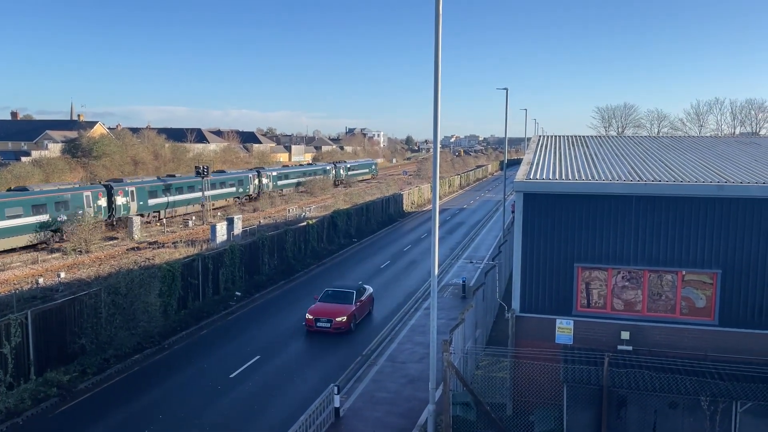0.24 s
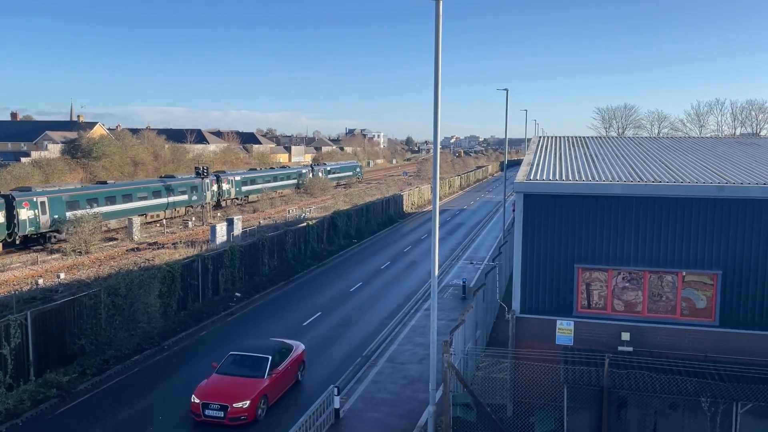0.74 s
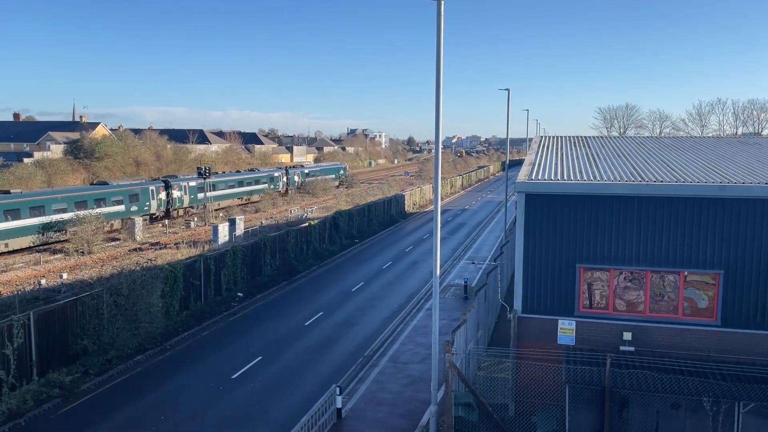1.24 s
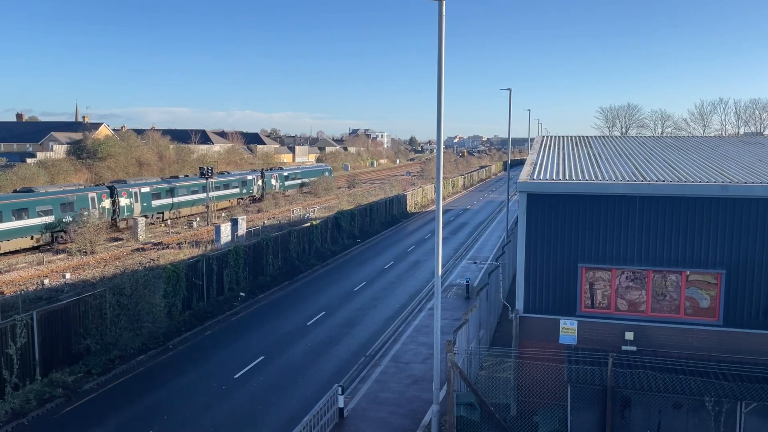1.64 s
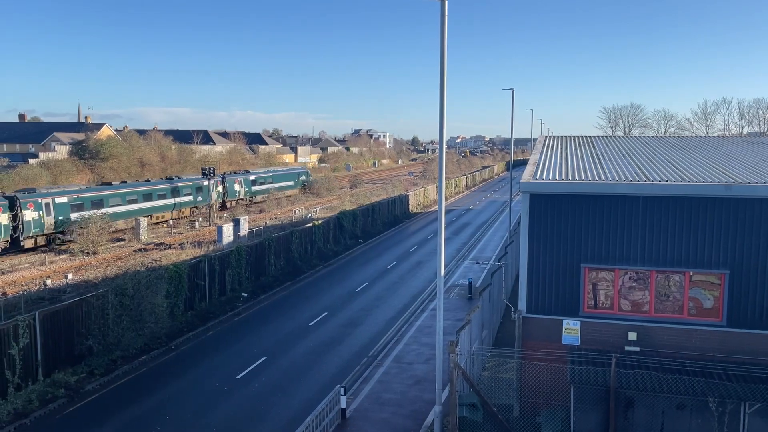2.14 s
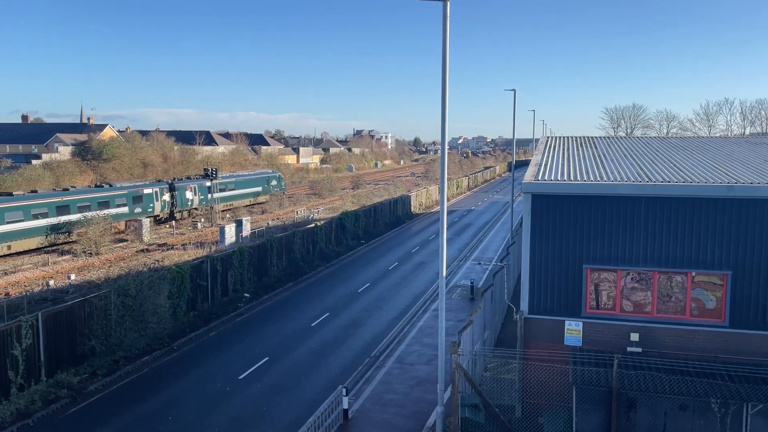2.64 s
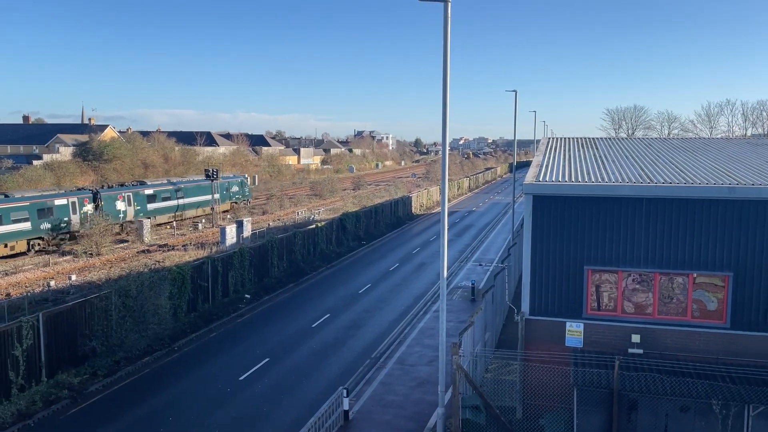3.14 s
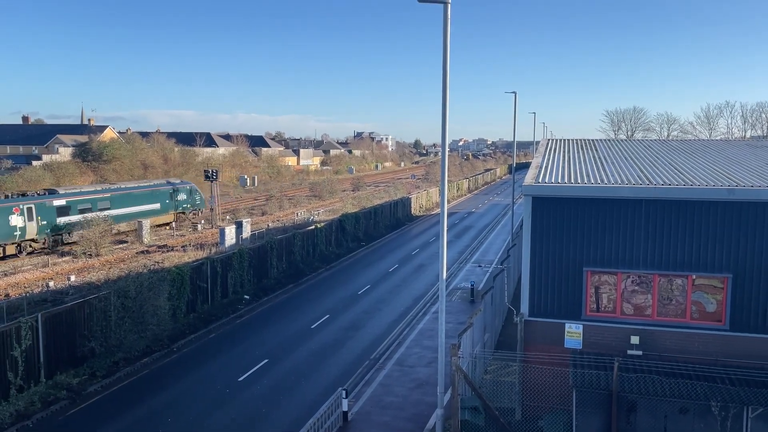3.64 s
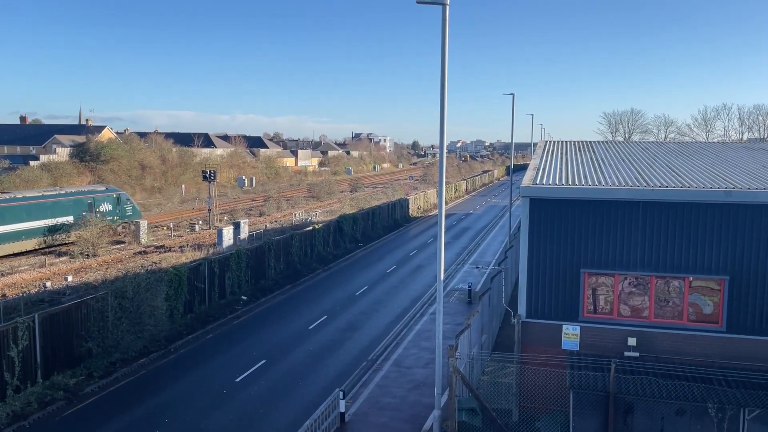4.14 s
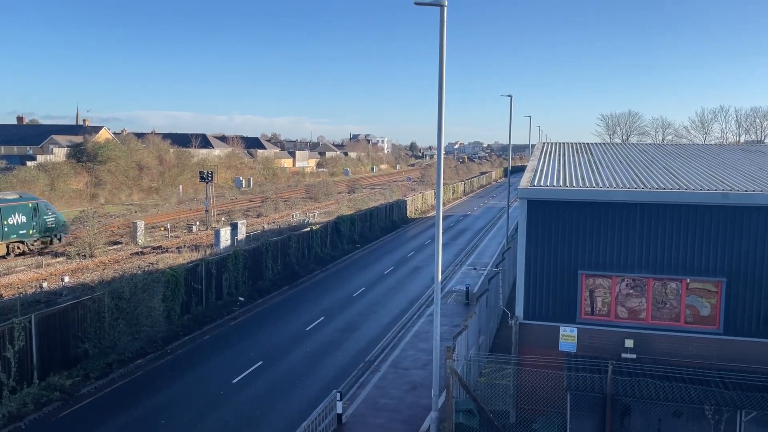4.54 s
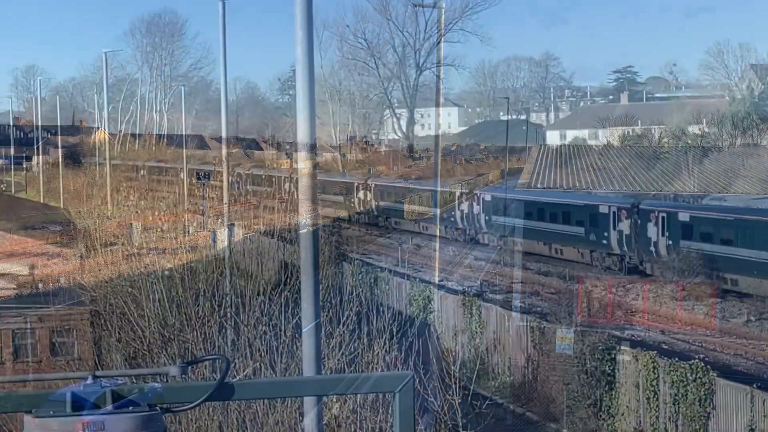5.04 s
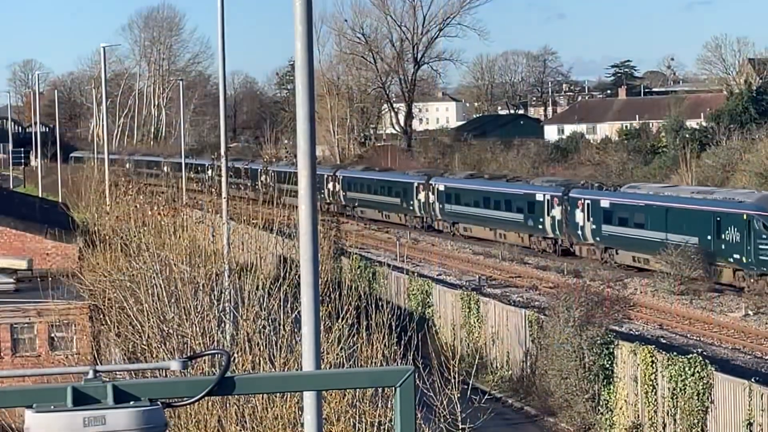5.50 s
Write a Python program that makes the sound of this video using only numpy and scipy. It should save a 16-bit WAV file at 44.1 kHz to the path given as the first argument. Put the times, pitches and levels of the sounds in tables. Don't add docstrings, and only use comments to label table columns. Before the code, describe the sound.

Steady train roar with low pulsing engine drones, singing rails and dull wheel knocks, an early car pass, then a crossfade to a quieter far-off line.

```python
import sys
import numpy as np
from scipy import signal
from scipy.fft import rfft, irfft
from scipy.io import wavfile
from scipy.ndimage import uniform_filter1d

SR = 44100
rng = np.random.default_rng(int(sys.argv[2]) if len(sys.argv) > 2 else 0)


def generate_wav(signal):
    frames = np.transpose(np.atleast_2d(signal))
    scaled = np.clip(frames, -1, 1) * 32767
    pcm = np.round(scaled).astype(np.int16)
    wavfile.write(sys.argv[1], SR, pcm)


def voltage_ratio(level):
    return 10 ** (np.asarray(level, float) / 20)


N = 254439
T = np.arange(N) / SR
F = np.fft.rfftfreq(N, 1 / SR)

# start_s, length_s,
# pitch_hz, level_db
ENGINE_PASSES = [(0.094, 0.46, 86.6, -24), (0.49, 0.6, 85.6, -31), (1.075, 0.47, 84.5, -27),
                 (1.627, 0.76, 85, -32), (2.42, 0.14, 84, -29), (2.56, 0.14, 84, -22),
                 (2.73, 0.2, 85.5, -26.5), (2.998, 0.53, 89, -29.5), (3.873, 0.355, 87.1, -26.5),
                 (4.222, 0.22, 87.1, -24.5), (4.48, 0.55, 88.2, -32), (5.196, 0.7, 81.6, -33.5),
                 (4.25, 0.5, 53, -36), (4.76, 0.85, 53.1, -36)]
# time_s, half_width_s, swell_db
BOOM_SWELLS = [(0.08, 0.06, 9), (0.6, 0.24, 4), (1.1, 0.052, 5), (1.32, 0.16, 7), (1.6, 0.15, 5),
               (2.5, 0.05, 5), (2.63, 0.026, 10), (2.8, 0.058, 5), (2.95, 0.06, 7.5), (3.1, 0.077, 7.5),
               (3.9, 0.18, 6.5), (4.2, 0.17, 0.5), (4.47, 0.08, 10), (5.2, 0.38, 3.5)]
# pitch_hz, level_db (per Hz)
BOOM_COLOUR = [(13, -61), (22, -67), (35, -12.5), (75, -0.5), (91, -11.5), (113, -5.5), (140, -9),
               (180, -16.5), (310, -120)]


def engines():
    rise_s, fall_s = 0.076, 0.11
    fade_db_per_s, sag_per_s = -3.5, -0.012
    boom_db = -33.5 + swells(BOOM_SWELLS) - 5 * dissolve()
    out = voltage_ratio(boom_db) * roar(BOOM_COLOUR, flicker_db=2.5, rate=12)
    for start, length, hz, db in ENGINE_PASSES:
        age = T - start
        on = np.clip(np.minimum(age / rise_s, (length - age) / fall_s), 0, 1)
        level = voltage_ratio(db + fade_db_per_s * np.clip(age, 0, length) + 3 * walk(11))
        out = out + on * level * tone(hz * (1 + sag_per_s * age), waver=0.0097)
    return out


# pitch_hz, level_db (per Hz)
RUMBLE_COLOUR = [(65, -15.5), (110, -2), (169, -1.5), (327, -6), (404, -4), (435, -7.5), (476, -6),
                 (560, -6.5), (730, -70.5), (1230, -120)]
ROAR_COLOUR = [(1030, -19), (1750, -4.5), (2550, 1), (3220, -3.5), (3620, -16.5), (4000, -19), (5200, -59),
               (8800, -120)]
RUSH_COLOUR = [(3000, -33.5), (3600, 4.5), (4400, -1.5), (5500, 2), (7000, -2.5), (9000, -2.5),
               (10500, -13), (11200, -34), (12000, -34), (12600, -12), (14300, -25), (14600, -26.5),
               (15300, -28.5)]
TOP_HISS_COLOUR = [(10400, -17.5), (11000, -5.5), (12100, -7.5), (12700, -18)]
# time_s, half_width_s, dip_db
HISS_LULLS = [
    (1.55, 0.21, -7),
    (2.0, 0.17, -1),
    (3.5, 0.2, -8),
    (3.9, 0.14, -1),
]


def rolling():
    out = voltage_ratio(loaded(-27.5, share=1.1)) * roar(RUMBLE_COLOUR, flicker_db=1.5, rate=9)
    out = out + voltage_ratio(loaded(-35, share=0.55)) * roar(ROAR_COLOUR, flicker_db=0.3, rate=10)
    out = out + voltage_ratio(loaded(-44, share=0.37)) * roar(RUSH_COLOUR, flicker_db=2.0, rate=8)
    hiss_db = loaded(-62, share=1.2) + swells(HISS_LULLS)
    return out + voltage_ratio(hiss_db) * roar(TOP_HISS_COLOUR, flicker_db=1.0, rate=14)


# start_s, end_s, pitch_hz,
# width_hz, level_db
SINGING_MODES = [(.3, 1.7, 885, 14, -35), (1.98, 2.6, 893, 14, -34), (3.9, 4.5, 2600, 280, -41),
                 (1.75, 2.3, 780, 160, -37), (3.62, 4.65, 445, 7, -37), (4.05, 4.8, 935, 20, -38),
                 (2.6, 3.4, 950, 22, -39.5), (3.55, 3.9, 890, 30, -39), (4.48, 4.7, 1010, 70, -39),
                 (.66, 1.25, 765, 70, -29), (1.0, 1.75, 810, 60, -33), (.9, 1.45, 1650, 260, -35),
                 (1.55, 2.2, 182, 8, -35), (2.45, 3.3, 181, 10, -36), (.95, 1.35, 550, 14, -39),
                 (3.9, 4.5, 365, 14, -43), (3.9, 4.6, 525, 10, -39.5)]


def singing():
    out = 0
    for start, end, hz, width, db in SINGING_MODES:
        on = np.clip(np.minimum((T - start) / 0.08, (end - T) / 0.15), 0, 1)
        out = out + voltage_ratio(db) * on * ring(hz, width, firm=0.7 * (width < 25))
    return out


# time_s, peak_db, ring_hz
JOINT_BLOWS = [
    (0.429, -15, 207),
    (1.83, -19, 198),
    (2.30, -16, 223),
    (2.62, -16, 120),
    (3.65, -15.5, 225),
    (4.33, -22, 159),
    (4.53, -19, 201),
]


def joints():
    clatter = roar([(90, -30), (250, -25), (500, 8), (1300, -6), (1600, -41)], flicker_db=3, rate=5)
    out = 0
    for s, db, hz in JOINT_BLOWS:
        age = np.maximum(T - s, 0)
        blow = age / 0.0078 * np.exp(1 - age / 0.0041)
        note = np.sin(2 * np.pi * hz * age)
        octave = np.sin(4 * np.pi * hz * age)
        out = out + voltage_ratio(db) * blow * (note + 0.5 * octave + 0.3 * clatter)
    return out


# time_s, half_width_s, swell_db
AIR_SURGES = [
    (0.07, 0.058, 2.5),
    (0.83, 0.2, 4),
    (1.6, 0.18, 4),
    (2.2, 0.22, 4.5),
    (3.05, 0.36, 8.5),
    (3.66, 0.1, 7.5),
    (4.0, 0.15, 4.5),
    (4.45, 0.2, 8),
]


def turbo():
    sag_from_s, gone_s = 3.2, 4.64
    hz = 10150 - 220 * np.maximum(T - sag_from_s, 0)
    db = -58.5 + swells(AIR_SURGES) - 45 * np.maximum(T - gone_s, 0)
    return voltage_ratio(db + 1.3 * walk(14)) * ring(hz, 790)


# pitch_hz, level_db (per Hz)
TYRE_COLOUR = [(260, -37), (450, -8), (477, -23.5), (550, -5), (595, -3), (790, -0.5), (1050, -4.5),
               (1200, -8.5), (1560, -13.5), (2640, -120)]
TREAD_COLOUR = [(620, -13), (1050, -21), (1160, -5.5), (1570, -5), (2000, -6.5), (2600, -15.5),
                (4400, -120)]


def tyres():
    speed_m_s, under_s, height_m = 5.8, 1.46, 8.7
    distance_m = np.hypot(speed_m_s * (T - under_s), height_m)
    screen_db = -22 * np.maximum(T - under_s, 0)
    car = height_m / distance_m * voltage_ratio(screen_db)
    tyre = np.hypot(car * voltage_ratio(-27), voltage_ratio(loaded(-29, share=0.79)))
    tread = np.hypot(car * voltage_ratio(-26.5), voltage_ratio(-35.5))
    out = tyre * roar(TYRE_COLOUR, flicker_db=1.2, rate=11)
    out = out + tread * roar(TREAD_COLOUR, flicker_db=1.2, rate=11)
    pan_db = 2 + 0.87 * T
    pan = voltage_ratio(np.array([pan_db, -pan_db]) / 2)
    return ports(out, ALIKE, LEAD, [(100, 12), (1500, -3.5), (9000, -9)]) * pan


# pitch_hz, level_db (per Hz)
FAR_COLOUR = [(90, -32), (115, -17), (215, -13), (270, -7), (410, -5.5), (560, -12), (800, -10),
              (1250, -14), (2100, -16.5), (3650, -28), (4700, -35), (6800, -41.5), (7200, -63)]
FAR_AIR_COLOUR = [(5500, -3), (6900, -18), (9000, -4.5), (10500, -14.5), (11000, -10), (14300, -26),
                  (15300, -27)]
# (pitch_hz, tilt_db)
FAR_ALIKE = [(60, .99), (280, .8), (600, .3), (1300, .45), (2800, .7), (3700, .55), (4600, .9), (5500, .4),
             (6600, .35), (7000, .95), (14000, .95)]
FAR_LEAD = [(20, 0), (5200, 0), (7000, -3.1), (8500, -3.0), (10400, -.6), (12200, .4), (13500, 3.1)]
FAR_TILT = [(60, -1), (110, 4), (200, -2), (360, 2.5), (660, -5.5), (1200, -2), (2180, 2), (3970, 0.5),
            (7230, 4.5), (13200, -6.5)]


def far_line():
    out = voltage_ratio(-31) * roar(FAR_COLOUR, flicker_db=0.8, rate=11)
    out = out + voltage_ratio(-60) * roar(FAR_AIR_COLOUR, flicker_db=2, rate=9.2)
    return ports(out, FAR_ALIKE, FAR_LEAD, FAR_TILT)


# time_s, load_db
WHEEL_LOAD = [(0.0, -1.5), (0.3, -1), (0.55, 0.5), (0.77, -3), (0.98, 0.5), (1.3, 0), (1.6, 1), (2.1, -1.5),
              (2.6, 0.5), (2.95, 0), (3.3, 1.5), (3.51, -3.5), (3.66, -0.5), (4.03, -0.5), (4.5, 0),
              (4.75, -3), (4.9, -6), (5.2, -5.5)]


def loaded(level_db, share):
    return level_db + share * np.interp(T, *np.transpose(WHEEL_LOAD))


def swells(table):
    return sum(db * np.exp(-((T - s) / width) ** 2) for s, width, db in table)


def dissolve():
    start_s, end_s = 4.61, 5.35
    return np.clip((T - start_s) / (end_s - start_s), 0, 1)


def unit(x):
    return x / np.sqrt(np.mean(x ** 2))


def along(table, hz):
    f, value = np.transpose(table)
    return np.interp(np.log(np.maximum(hz, 1)), np.log(f), value)


def walk(rate):
    k = int(SR / rate)
    held = np.repeat(rng.standard_normal(N // k + 1), k)
    return uniform_filter1d(uniform_filter1d(held, k), k)[:N]


def roar(spectrum, flicker_db, rate):
    f = np.transpose(spectrum)[0]
    inside = (F > f[0]) * (F < f[-1])
    whole = rfft(rng.standard_normal((2, N))) * voltage_ratio(along(spectrum, F)) * inside
    place = 2 * np.log2(np.maximum(F, 1) / f[0])
    out = 0
    for k in range(int(2 * np.log2(f[-1] / f[0])) + 2):
        band = whole * np.sqrt(np.clip(1 - abs(place - k), 0, 1))
        out = out + voltage_ratio(flicker_db * walk(rate)) * irfft(band, N)
    return unit(out)


def ring(hz, width, firm=0):
    push = rfft(rng.standard_normal((2, 2, N))) / (1 + (2 * F / width) ** 2)
    swing = irfft(push, N)
    turn = 2 * np.pi * np.cumsum(hz + 0 * T) / SR
    swing = swing / np.hypot(*swing) ** firm
    return unit(swing[0] * np.cos(turn) + swing[1] * np.sin(turn))


def tone(hz, waver):
    turn = 2 * np.pi * np.cumsum(hz * (1 + waver * walk(8.7))) / SR
    return np.sqrt(2) * np.array([np.sin(turn), -np.cos(turn)])


# pitch_hz, likeness (0-1)
ALIKE = [(30, .985), (130, .98), (300, .9), (500, .82), (700, .7), (1000, .72), (2200, .52), (2700, .7),
         (4000, .3), (4700, .5), (6300, .25), (7000, .72), (7700, .93), (11000, .93), (14000, .95)]
# pitch_hz, left_lead_rad
LEAD = [(20, 0), (500, 1.45), (750, .7), (1200, 1.1), (2000, .3), (2670, -.6), (3200, 0), (3700, 2.2),
        (4200, -.5), (5100, -.7), (5600, -3.5), (8500, -3.0), (10500, -.7), (12200, .4), (13500, 3.1)]
# pitch_hz, left_minus_right_db
TILT = [(60, 0.5), (110, 3), (200, 3), (360, -1), (660, 6.5), (1200, -19), (2180, -12), (3970, 2),
        (7230, -4), (13200, 4.5)]


def ports(x, alike, lead, tilt):
    direct, scattered = rfft(x)
    like = np.clip(along(alike, F), 0, 1)
    half = voltage_ratio(along(tilt, F) / 2)
    shift = np.exp(-1j * np.interp(F, *np.transpose(lead)))
    right = like * shift * direct + np.sqrt(1 - like ** 2) * scattered
    return irfft(np.array([direct * half, right / half]), N)


def scene():
    fade = dissolve()
    near = ports(rolling() + singing() + joints() + turbo(), ALIKE, LEAD, TILT) + tyres()
    drone = ports(engines(), ALIKE, LEAD, TILT)
    return drone + near * np.sqrt(1 - fade) + far_line() * np.sqrt(fade)


def thin_treble(x, under_db, faint_db, fall_db, from_hz, sparse_hz):
    how = dict(window="cosine", nperseg=2048, noverlap=1024)
    mid_side = np.array([x[0] + x[1], x[0] - x[1]]) / 2
    hz, _, spec = signal.stft(mid_side, SR, boundary="even", **how)
    power = abs(spec) ** 2
    band = uniform_filter1d(power[:, :1024].reshape(2, 64, 16, -1).mean(axis=2), size=2)
    weak = np.repeat(band < band[::-1] * voltage_ratio(2 * under_db), 16, axis=1)
    spec[:, :1024][weak & (hz[:1024, None] > from_hz)] = 0
    masker = (hz > 2 * from_hz) & (hz < sparse_hz)
    mask = uniform_filter1d(power[:, masker].mean(axis=(0, 1)), size=9)
    limit_db = faint_db - fall_db * (hz[:, None] - sparse_hz) / 1000
    luck = np.repeat(rng.standard_normal((2, 129, power.shape[2])), 8, axis=1)[:, :len(hz)]
    nearby = uniform_filter1d(power, size=7, axis=1) * voltage_ratio(2 * 3 * luck)
    spec[(nearby < mask * voltage_ratio(2 * limit_db)) & (hz[:, None] > sparse_hz)] = 0
    mid, side = signal.istft(spec, SR, **how)[1][:, :N]
    return np.array([mid + side, mid - side])


def top_cut(x):
    return signal.sosfilt(signal.butter(12, 15150, fs=SR, output="sos"), x)


def record(dry):
    edge_s = 0.006
    bass_cut = signal.butter(1, 25, "high", fs=SR, output="sos")
    heard = signal.sosfilt(bass_cut, dry)
    heard = heard * np.clip(np.minimum(T, T[-1] - T) / edge_s, 0, 1)
    return top_cut(heard)


dry = scene()
out = record(dry)
generate_wav(out)
```